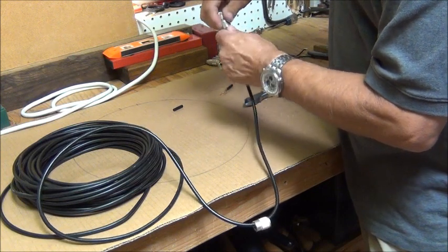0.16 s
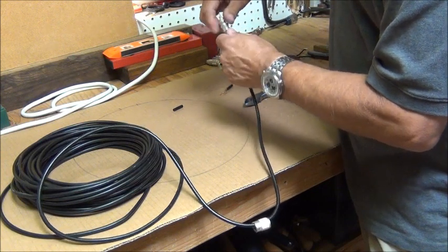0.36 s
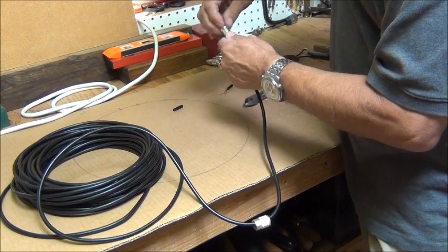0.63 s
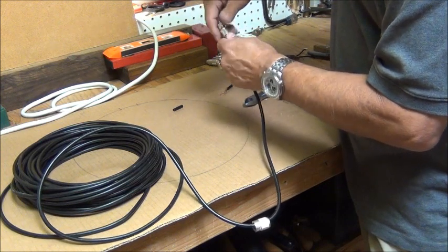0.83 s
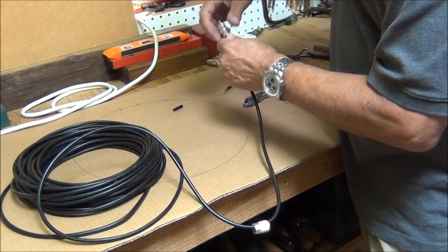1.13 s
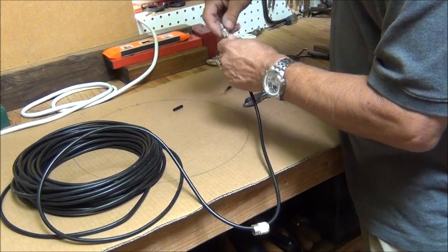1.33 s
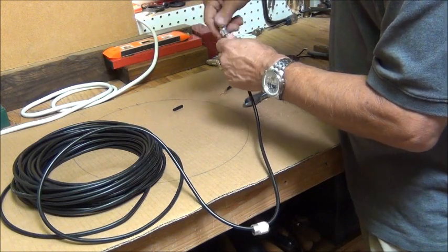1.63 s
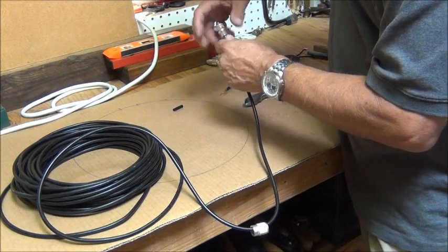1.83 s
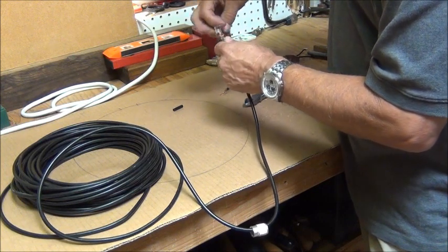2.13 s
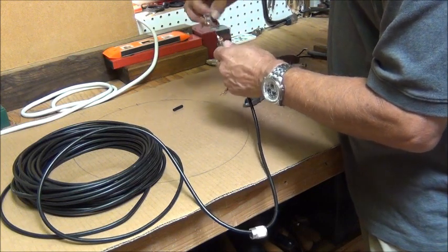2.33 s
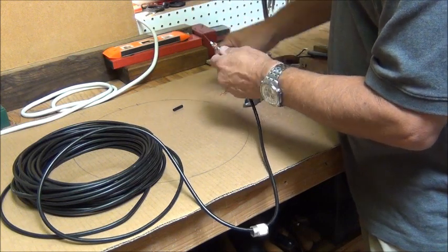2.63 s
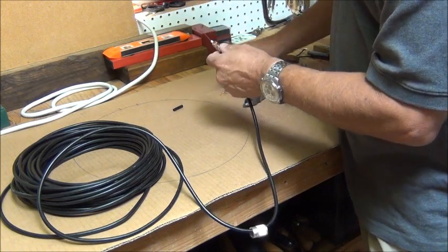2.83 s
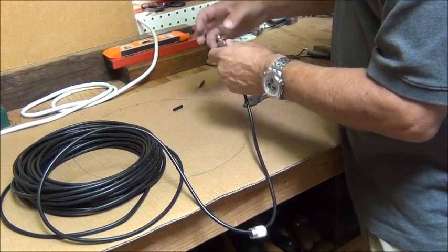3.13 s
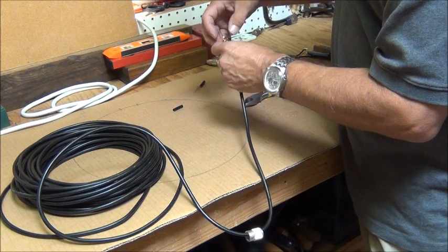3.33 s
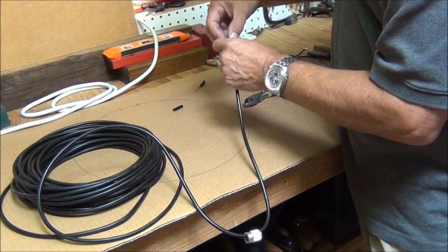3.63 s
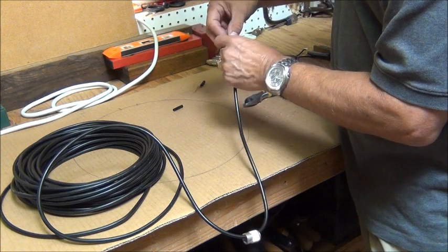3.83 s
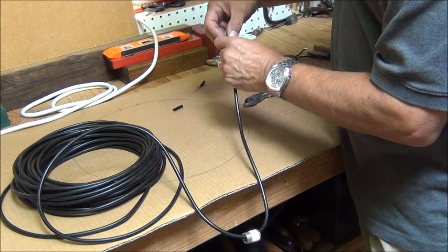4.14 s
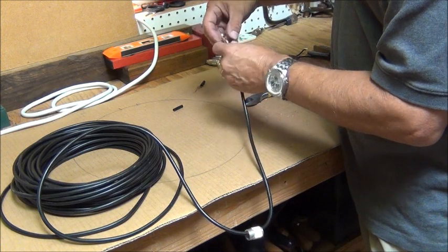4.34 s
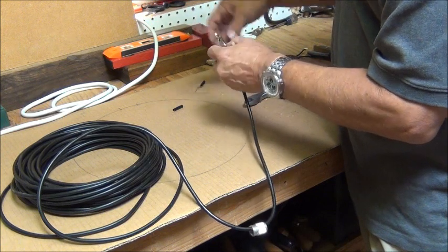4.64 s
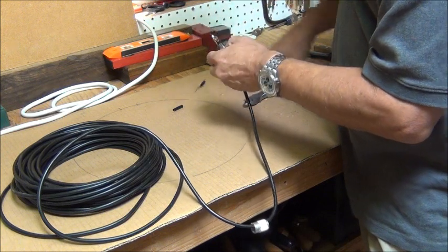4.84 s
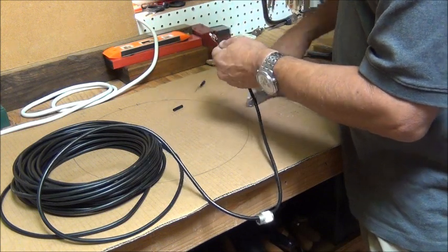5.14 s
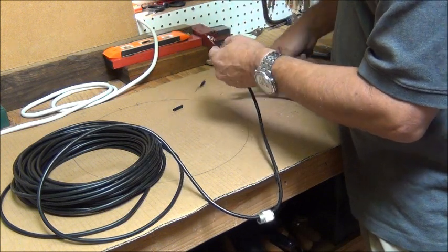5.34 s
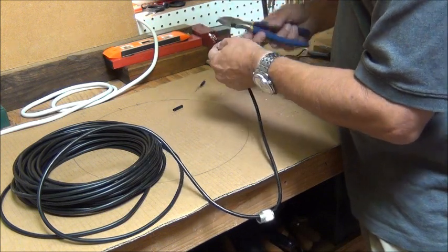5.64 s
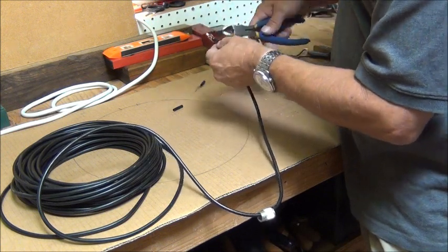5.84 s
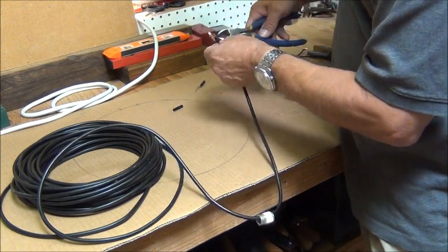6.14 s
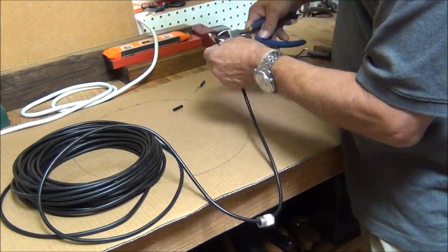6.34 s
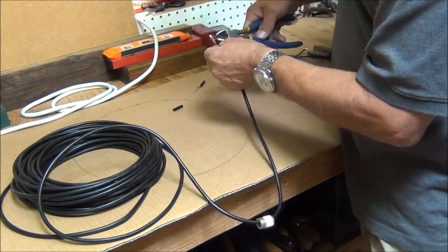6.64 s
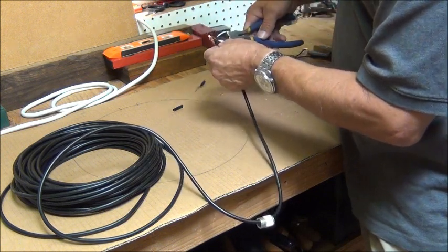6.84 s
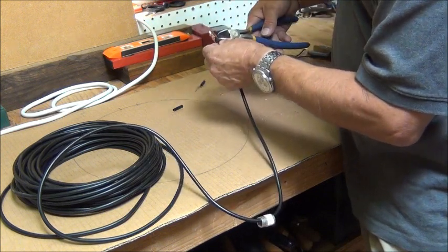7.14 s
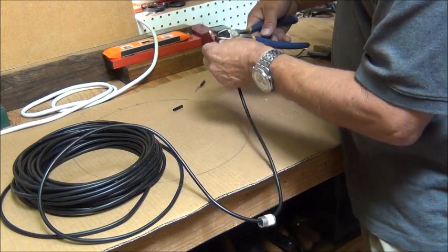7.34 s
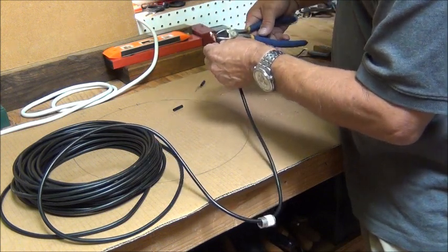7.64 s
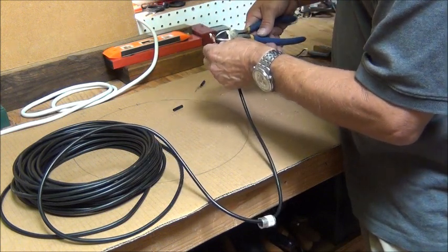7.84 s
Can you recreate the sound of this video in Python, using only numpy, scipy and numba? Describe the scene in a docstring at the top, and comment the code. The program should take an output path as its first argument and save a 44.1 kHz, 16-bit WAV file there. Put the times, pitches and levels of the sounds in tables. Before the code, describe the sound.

In a small workshop room, fingers fuss with cable braid, making faint high ticks and soft hissy rubs. Around three seconds a tool lands on the board with rattling knocks and scrapes; harder woody knocks follow past four and five seconds. A single bright steel clack of the cutters comes near 5.8, then almost only low rumble, hiss and fan tone remain. Close stereo microphone.

```python
"""Hands strip and trim a coaxial cable at a board-topped workbench: tools knock, land and slide on it.
Knocks ring a set of bench tones and add a short crack of noise; wire, braid and tool tick brightly.
The cutters clack shut as a burst of short metal tones, fingers rub hiss from the braid, a thin whistle glides.
A small room answers with a noise tail over rumble, hiss, a breathy fan tone and a steady whine.
The recorder turns down after the loudest peaks and recovers slowly."""
import sys
import numpy as np
from scipy import signal
from scipy.fft import rfft, irfft
from scipy.io import wavfile
from scipy.ndimage import uniform_filter1d
from numba import njit

SR = 44100
rng = np.random.default_rng(int(sys.argv[2]) if len(sys.argv) > 2 else 0)


def file_out(sig):
    """Save sig as 16-bit WAV at sys.argv[1]."""
    # one column per channel
    cols = np.atleast_2d(sig).T
    # limit, then scale
    lim = np.clip(cols, -1, 1)
    pcm = np.round(lim * 32767).astype(np.int16)
    wavfile.write(sys.argv[1], SR, pcm)


N = 351873  # length in samples


def undb(db):
    """Turn decibels into a gain factor."""
    return 10 ** (np.asarray(db) / 20)


def fade(t60, length=.4):
    """Exponential decay, 60 dB down after t60 seconds (2 ms at least)."""
    return np.exp(-np.log(1000) * np.arange(int(length * SR)) / SR / max(t60, .002))


def lowpass(x, hz):
    """Gently remove what lies above hz."""
    return signal.sosfilt(signal.butter(2, hz, fs=SR, output="sos"), x)


def band(x, hz, octaves):
    """Keep a band around hz, its edges held inside the range of hearing."""
    edges = [hz * 2 ** (-octaves / 2), hz * 2 ** (octaves / 2)]
    edges = np.clip(edges, [20, 40], [15000, 20000])
    return signal.sosfilt(signal.butter(2, edges, "bandpass", fs=SR, output="sos"), x)


def add(out, s, x, peak_db, pan_db=0.):
    """Lay a sound into both channels at s seconds; pan_db is the level difference left to right."""
    i = int(s * SR)
    x = x[:N - i] / np.abs(x).max()
    out[:, i:i + len(x)] += x * undb(peak_db + np.array([[pan_db], [-pan_db]]) / 2)


def ring(modes):
    """A struck body: dying sine tones, each with its own chance strength and sign."""
    t = np.arange(int(.4 * SR)) / SR
    scatter_db = 1.8
    tones = []
    for hz, db, t60 in modes:
        strength = undb(db + scatter_db * rng.standard_normal()) * rng.choice([-1, 1])
        tones.append(strength * np.sin(2 * np.pi * hz * t) * fade(t60))
    return sum(tones)


def chatter(body, t60, spike):
    """Contact that does not settle at once: a first blow and a dying run of small ones drive the body."""
    blows = rng.standard_normal(int(.4 * SR)) * fade(t60)
    blows[0] += spike
    return signal.fftconvolve(body, blows)


def crack(hz, octaves, t60, spike):
    """A sharp contact pulse followed by a dying rattle, in one band."""
    x = rng.standard_normal(int(.4 * SR)) * fade(t60)
    x[0] += spike
    return band(x, hz, octaves)


def walk(rate):
    """Random levels, 1 / rate seconds apart, joined by straight ramps."""
    k = int(SR / rate)
    return uniform_filter1d(np.repeat(rng.standard_normal(N // k + 1), k), k)[:N]


def knocks():
    """Each blow wakes the bench tones near its own centre and cracks on the surface."""
    # blows: t/s, thud peak level/dB, thud centre f/Hz, settling t60/s, crack peak level/dB, crack f/Hz
    bench_blows = [(2.967, -13.5, 524, 0.14, -22, 2880), (2.99, -19.5, 480, 0.35, -21.5, 2720),
                   (3.073, -10, 413, 0.12, -16, 2640), (3.108, -12, 403, 0.13, -21, 2900),
                   (3.139, -32, 164, 0.16, -25.5, 2160), (3.175, -47, 178, 0.19, -22.5, 2700),
                   (4.181, -10, 654, .22, -5.5, 1970), (4.239, -18, 613, 0.15, -23, 1370),
                   (4.251, -23.5, 384, 0.6, -40, 1120), (4.347, -18.5, 790, 0.18, -31.5, 1310),
                   (4.36, -18.5, 570, 0.15, -29.5, 1240), (4.377, -11.5, 716, .15, -14.5, 1630),
                   (4.384, -33, 581, 0.092, -8.5, 1110), (4.431, -11, 794, 0.11, -12.5, 1400),
                   (4.693, -33, 370.8, 0.13, -45, 1033), (4.941, -26.5, 232, 0.21, -45, 1190),
                   (4.979, -27, 162, .12, -45, 1040), (5.035, -25.5, 203, .18, -38.5, 1010),
                   (5.111, -24, 270, 0.38, -23, 1840), (5.217, -9.5, 260, 0.17, -22, 1150),
                   (5.234, -14, 175, 0.13, -25, 1110), (5.278, -15, 220, 0.066, -30, 2290),
                   (5.304, -15.5, 172, 0.078, -28.5, 2230)]
    # tones of the bench: f/Hz, relative level/dB, t60/s
    bench_tones = [(130, -1, 0.082), (166, -2, 0.14), (210, -7, 0.093), (260, -4, 0.1), (325, -1, 0.03),
                   (319, 1, 0.029), (381, -2, 0.05), (445.5, -2, 0.046), (488, 0.5, 0.031), (583, 2, 0.035),
                   (688, 3, 0.012), (816, 0, 0.018), (1207, 9, 0.012), (1380, -12, 0.0078)]
    # a hand stills the board: t/s, fall time/s, level after/dB
    hand_grip = (5.338, .008, -18)
    # the hardest first contact: t/s, peak level/dB, centre f/Hz
    hard_contact = (4.1806, -.5, 2100)
    crack_octaves = 1.44
    bright_t60_s = 0.05  # the top of each crack is gone first
    out = np.zeros((2, N))
    for s, thud_db, thud_hz, settle_t60, crack_db, crack_hz in bench_blows:
        modes = [(hz, db - 5.1 * np.log2(hz / thud_hz) ** 2, t60) for hz, db, t60 in bench_tones]
        thud = chatter(ring(modes), settle_t60, spike=13.3)
        thud = band(thud, 463, 2.87)  # a small board radiates no deep bass
        add(out, s, thud, thud_db)
        crack_t60 = 0.069 + 0.31 * settle_t60  # a base time plus a share of the settling
        snap = crack(crack_hz, crack_octaves, crack_t60, spike=4.8)
        snap = band(snap, crack_hz, 2.34 * crack_octaves)
        dull = lowpass(snap, 2600)
        snap = dull + (snap - dull) * fade(bright_t60_s)
        snap = lowpass(snap, 5200)  # the soft board swallows the top
        add(out, s, snap, crack_db)
    s, fall, db = hand_grip
    out *= undb(np.interp(np.arange(N) / SR, [s, s + fall], [0, db]))
    s, db, hz = hard_contact
    pulse = band(band(signal.unit_impulse(400), hz, 1.3), hz, 2.2)
    add(out, s, -pulse, db)
    return out


def landings():
    """A tool lands on the bench and its frame rings in a few metal tones."""
    # landings: t/s, peak level/dB
    tool_drops = [(2.968, -24.5), (3.074, -21), (3.11, -31)]
    # tones of the tool frame: f/Hz, relative level/dB, t60/s
    frame_tones = [(2190, -9, 0.043), (2890, -1, 0.14), (3390, -14, 0.088)]
    out = np.zeros((2, N))
    for s, db in tool_drops:
        add(out, s, chatter(ring(frame_tones), 0.075, spike=11.5), db)
    return out


def shakes():
    """The bench frame shudders: narrow low noise that dies away."""
    # shudders: t/s, peak level/dB, f/Hz, t60/s
    frame_shudders = [(4.191, -44, 168, 0.54), (4.368, -33.5, 169, 0.94), (4.95, -45, 47.5, .25),
                      (5.222, -44, 48, .25)]
    out = np.zeros((2, N))
    for s, db, hz, t60 in frame_shudders:
        add(out, s, crack(hz, 0.33, t60, spike=0), db)
    return out


def clacks():
    """The cutter jaws clack shut and ring as steel; handles, grips and spring sound from the first contact."""
    # jaw contacts: t/s, peak level/dB
    jaw_contacts = [(5.7693, -3), (5.771, -12), (5.7726, -10)]
    # tones of the steel jaws: f/Hz, relative level/dB, t60/s
    jaw_tones = [(2680, 3.5, 0.011), (3200, -2, 0.0053), (4400, -0.5, 0.0032), (5400, -10, 0.0023),
                 (6620, 3.5, 0.0031), (7750, 1.5, 0.0066), (9240, -1, 0.0038), (9930, 7, 0.0026),
                 (12500, -4, 0.0018), (14500, -8, 0.0021)]
    handles_db, handles_t60_s, grips_db, spring_db = -21, .12, -28, -16
    out = np.zeros((2, N))
    for s, db in jaw_contacts:
        add(out, s, chatter(ring(jaw_tones), 0.0088, spike=1.3), db)
    shut_s = jaw_contacts[0][0]
    add(out, shut_s, chatter(ring(jaw_tones), handles_t60_s, spike=0), handles_db)  # loose handles rattle
    add(out, shut_s, crack(1040, 1.7, 0.038, spike=6.8), grips_db)  # the grips knock dully
    add(out, shut_s, crack(8500, 1.9, 0.093, spike=3.5), spring_db)  # pivot and spring buzz broadly
    return out


def ticks():
    """Short bright clicks of wire, braid and tool that also ring the stripping tool."""
    # clicks: t/s, peak level/dB, centre f/Hz, width/octaves
    bright_clicks = [(.2883, -33, 12200, 2.1), (.7347, -31, 11500, 1.3), (.7617, -20.5, 12800, 1.5),
                     (.922, -22, 3180, 2.4), (.932, -33, 3200, 1.2), (.9916, -27, 14300, 1.6),
                     (1.3753, -30, 13600, 2.4), (1.4167, -29, 11000, .85), (1.487, -23.5, 8000, 2.2),
                     (1.5006, -17, 11200, 1.2), (1.804, -26, 10600, 0.8), (1.837, -25, 8820, 0.45),
                     (2.07, -28, 8300, 1.4), (2.173, -32.5, 12000, 1.2), (2.294, -28, 11100, 1.8),
                     (2.3477, -24, 11600, 0.39), (2.3604, -24, 12600, 0.45), (2.389, -17, 10000, .9),
                     (2.4298, -21, 11200, 0.91), (2.9673, -15.5, 3340, 3.9), (3.073, -16, 3490, 1.8),
                     (3.108, -16, 3800, 1.5), (3.1763, -12, 3340, 1), (3.241, -17.5, 9970, 0.35),
                     (3.3099, -27, 9420, 1.2), (3.333, -15, 12100, 0.84), (3.434, -27.5, 13400, .91),
                     (3.4545, -31, 10200, 0.78), (3.5258, -27.5, 10200, 0.5), (3.58, -33, 11800, .97),
                     (3.9569, -32, 11400, 0.82), (4.181, -28, 6500, 1.3), (4.975, -32.5, 4940, 1.2),
                     (5.111, -20.5, 3250, 0.8), (5.2993, -17.5, 3110, 1.5), (6.96, -31, 5810, 1.6)]
    # tones of the stripping tool: f/Hz, relative level/dB, t60/s
    blade_tones = [(3300, 3, 0.004), (5170, -5, 0.007), (6430, -8, 0.0085), (9000, 2.5, 0.0049),
                   (10580, 1.5, 0.0042), (11520, 2, 0.0061), (13030, -2, 0.007)]
    tick_t60_s, pan_spread_db = 0.021, 2
    out = np.zeros((2, N))
    for s, db, hz, octaves in bright_clicks + crinkles():
        octaves = max(octaves, .1)
        pan_db = pan_spread_db * rng.standard_normal()
        click = band(crack(hz, octaves, tick_t60_s, spike=11.0), hz, 1.6 * octaves)
        add(out, s, click, db, pan_db)
        modes = []
        for f, level, decay in blade_tones:  # tones far from the click's pitch sound weaker
            distance = np.log2(f / hz) / min(octaves, 1)
            modes.append((f, level - 4.8 * distance ** 2, decay))
        add(out, s, chatter(ring(modes), 0.82 * tick_t60_s, spike=1.7), db - 4.5, pan_db)
    return out


def crinkles():
    """List faint ticks at chance moments while the braid is fingered."""
    # spells of fingering: start t/s, end t/s
    finger_spells = [(.08, .36), (.54, .72), (1.06, 1.14), (1.33, 1.37), (1.72, 1.78), (3.46, 3.58),
                     (7.05, 7.26)]
    ticks_per_s, faintest_db, middle_hz, octaves = 12, -39.5, 11000, 0.94
    rows = []
    for start, end in finger_spells:
        count = int(np.ceil((end - start) * ticks_per_s))
        for at, size, pitch in rng.random((count, 3)):
            s = start + at * (end - start)
            hz = middle_hz * 2 ** (.4 * (pitch - .5))
            rows.append((s, faintest_db + 4.6 * size, hz, octaves))
    return rows


def pings():
    """A small metal part rings high, with a broad click at each contact."""
    # pings: t/s, peak level/dB, share of the tones above 13 kHz (0-1)
    part_hits = [(4.5067, -26, 0.84), (4.5718, -25.5, 0.4)]
    # tones of the part: f/Hz, relative level/dB, t60/s
    part_tones = [(6300, -8, 0.034), (9130, 2, .04), (9350, -4, 0.086), (12100, -2, .06), (13930, -8, .05),
                  (13900, -2, 0.077)]
    out = np.zeros((2, N))
    for s, db, share in part_hits:
        share = np.clip(share, .02, .98)
        modes = []
        for hz, level, t60 in part_tones:
            weight = share if hz > 13000 else 1 - share
            modes.append((hz, level + 20 * np.log10(weight), t60))
        add(out, s, chatter(ring(modes), .02, spike=5.4), db)
        add(out, s, crack(6200, 5.4, 0.056, spike=1.8), db - 0.6)
    return out


def slides():
    """Tools slide over the board: dense scraping that starts abruptly, its very top dulled by the board."""
    # slides: start t/s, length/s, level at start/dB, change by the end/dB, centre f/Hz, width/octaves
    # (levels hold before the uneven grains and the board's own band)
    tool_slides = [(.63, 0.13, -67, 11, 4970, 1.1), (1.426, 0.067, -53, -8, 5000, 0.68),
                   (1.487, .05, -44, -15, 5350, .43), (1.792, 0.086, -51.5, -3, 5000, 2.1),
                   (2.36, 0.065, -56, -3, 5000, .8), (2.964, 0.06, -42, 1.5, 9000, 1.8),
                   (3.0, 0.033, -39, 8, 11100, .6), (3.014, 0.054, -31.5, -13, 3680, 1.4),
                   (3.035, .03, -32, -12, 11100, 0.59), (3.073, 0.027, -29.5, -11, 11200, .73),
                   (3.074, .035, -33, -6, 3500, 1.8), (3.11, 0.065, -38.5, -8, 8000, 2.3),
                   (3.157, 0.013, -35.5, 6, 11000, 1.3), (3.177, .06, -33, -17, 2600, .9),
                   (3.193, .06, -33.5, -9, 11700, 0.77), (5.11, .011, -29, -7, 7000, 1.7),
                   (5.128, .013, -23.5, -16, 8000, 5.1), (5.145, 0.045, -22, -11.5, 3880, 2.66),
                   (5.198, 0.069, -33, -2.5, 7000, 4.6), (5.271, 0.057, -44, -12, 2980, 1.9)]
    out = np.zeros(N)
    for s, length, db, change_db, hz, octaves in tool_slides:
        i, n = int(s * SR), max(int(length * SR), 50)
        scrape = band(rng.standard_normal(6000)[:n], hz, octaves)
        level = undb(db + np.linspace(0, change_db, len(scrape)))
        out[i:i + len(scrape)] += scrape / scrape.std() * level
    grains = undb(3.4 * walk(500) + 1.6 * walk(150))  # grains catch unevenly
    return band(out * grains, 3100, 4.6)


@njit
def sweep(x, hz, q):
    """Resonant band filter whose centre can move; a larger q is wider."""
    y, b, l = np.empty(len(x)), 0., 0.
    for i in range(len(x)):
        g = np.tan(np.pi * hz[i] / SR)
        v = (b + g * (x[i] - l)) / (1 + g * (g + q))
        b, l, y[i] = 2 * v - b, l + 2 * g * v, q * v
    return y


def rubs():
    """Fingers rub the braid: uneven hiss through a wide resonance, swelling and sinking with each rub."""
    # rubs: start t/s, loudest t/s, end t/s, level at loudest/dB, centre f/Hz
    finger_rubs = [(0.622, 0.727, 0.85, -52.5, 8000), (1.4, 1.46, 1.58, -44.5, 8650),
                   (1.723, 1.76, 1.95, -51, 10300), (2.05, 2.16, 2.32, -50, 8400),
                   (2.33, 2.38, 2.5, -41.5, 10700), (4.94, 4.975, 5.18, -52, 5600),
                   (5.523, 5.6, 5.6, -47, 10600), (5.853, 5.9, 5.9, -50, 10000)]
    edge_db = -61.5  # level at which each rub starts and, unless cut at its loudest, ends
    t, gain, hz = np.arange(N) / SR, np.zeros(N), np.full(N, 9000.)
    for start, loudest, end, db, centre in finger_rubs:
        inside = (t > start) & (t < end)
        gain[inside] = undb(np.interp(t[inside], [start, loudest, end], [edge_db, db, edge_db]))
        hz[inside] = centre
    grit = rng.standard_normal(N) * undb(4.1 * walk(300) + 2.6 * walk(60))
    hz = np.clip(hz, 2000, 15000)
    grit = sweep(sweep(grit, hz, 1.9), hz, 1.9)
    return gain * grit / grit.std()


def whistle():
    """A faint sine glides high up, its level flickering."""
    # two glides, each a list of points: t/s, f/Hz
    glides = [
        [(1.2, 11700), (1.27, 11400), (1.32, 11900), (1.37, 12700), (1.46, 12950), (1.59, 13000), (1.65, 12000),
         (1.71, 11950), (1.76, 12750), (1.9, 13000), (1.96, 12000)],
        [(4.73, 11700), (4.78, 12050), (4.83, 13100), (4.88, 13200), (4.95, 13000)],
    ]
    middle_db, db_per_khz, middle_hz, fade_s = -64, -2.5, 11950, .03  # fainter away from the middle pitch
    out, flicker = np.zeros(N), undb(4.5 * walk(40))
    for glide in glides:
        s, hz = np.transpose(glide)
        i = np.arange(int(s[0] * SR), int(s[-1] * SR))
        pitch = np.interp(i / SR, s, hz)
        ends = np.minimum(1, np.minimum(i / SR - s[0], s[-1] - i / SR) / fade_s)
        db = middle_db + db_per_khz * np.abs(pitch - middle_hz) / 1000
        tone = np.sqrt(2) * np.sin(2 * np.pi * np.cumsum(pitch) / SR)
        out[i] = undb(db) * ends * tone
    return out * flicker


def room(x):
    """Echoes as a dense noise tail; its treble differs more between the channels and dies first."""
    t60_s, treble_t60_s, tail_db = 0.37, 0.14, -6
    noise = rng.standard_normal((3, int(.4 * SR)))  # one shared, one for each channel
    low = lowpass(noise, 1200)
    high = noise - low
    low_tail = (low[0] + 0.099 * low[1:]) * fade(t60_s)
    high_tail = (high[0] + 1.24 * high[1:]) * fade(treble_t60_s)
    tail = (low_tail + high_tail) * (1 - fade(0.015))  # the tail builds up briefly
    tail *= undb(tail_db) / np.sqrt((tail ** 2).sum(axis=1, keepdims=True))
    return signal.fftconvolve(x, tail, axes=1)[:, :N]


def coloured(table, db):
    """Steady noise with the given spectrum, scaled to an overall level."""
    hz, level = np.transpose(table)
    f = np.maximum(np.arange(N // 2 + 1) * SR / N, 1)
    shape = undb(np.interp(np.log(f), np.log(hz), level))
    x = irfft(rfft(rng.standard_normal(N)) * shape, N)
    return x * undb(db) / x.std()


def fan():
    """A breathy fan tone: narrow bands of noise, partly shared by the two channels."""
    # bands: f/Hz, width/Hz, level before sharing/dB
    fan_bands = [(873, 53, -58.5), (904, 27, -61)]
    out = np.zeros((2, N))
    for hz, width, db in fan_bands:
        tone = band(rng.standard_normal((2, N)), hz, width / hz * np.log2(np.e))
        left, right = tone[0] + 0.21 * tone[1], tone[0] - 0.17 * tone[1]
        out += undb(db) * np.array([left, right]) / tone.std()
    return out


def whine():
    """A steady electrical whine: one very high sine."""
    whine_hz, whine_db = 15735, -64
    return np.sqrt(2) * undb(whine_db) * np.sin(2 * np.pi * whine_hz * np.arange(N) / SR)


def air():
    """Room rumble and microphone hiss: noise alike in both channels plus noise opposite in them."""
    # spectrum of the alike part: f/Hz, relative level/dB
    mid_spectrum = [(15, -42), (25, -9.5), (55, 0.5), (92, -1.5), (157, 0), (242, -4.5), (293, -4),
                    (335, -5.5), (516, -7.5), (887, -8), (962, -9), (1520, -14), (16000, -20.5)]
    # spectrum of the opposite part: f/Hz, relative level/dB
    side_spectrum = [(15, -55), (25, -28), (130, -6.5), (161, -9), (249, -1.5), (1100, -3), (1260, -4.5),
                     (2000, -8.5), (14400, -21), (16000, -31)]
    mid, side = coloured(mid_spectrum, db=-47), coloured(side_spectrum, db=-53)
    return np.array([mid + side, mid - side])


def scene():
    """Bench sounds with their room over the steady background."""
    near = knocks() + landings() + shakes() + clacks() + ticks() + pings()
    near = near + slides() + rubs() + whistle()  # these three are alike in both channels
    return near + room(near) + fan() + whine() + air()


@njit
def follow(x, hold, release):
    """Peak follower: jumps up, holds for some samples, then sinks slowly."""
    e, y, wait = 0., np.empty(len(x)), 0.
    for i in range(len(x)):
        if x[i] > e:
            e, wait = x[i], hold
        elif wait > 0:
            wait -= 1
        else:
            e *= release
        y[i] = e
    return y


def record(dry):
    """Gain control turns down after peaks above a limit and recovers slowly; the top is cut."""
    limit, hold_s, recovery_db_per_s, top_hz = .52, .4, 6, 16000
    sensed = lowpass(dry, 4000)  # the control listens less to the treble
    peak = follow(np.abs(sensed).max(axis=0), hold_s * SR, undb(-recovery_db_per_s / SR))
    gain = np.minimum(1, limit / (peak + 1e-9))
    gain = signal.lfilter([.005], [1, -.995], gain - 1) + 1  # the gain moves over a few milliseconds
    return signal.sosfilt(signal.ellip(10, .2, 70, top_hz, fs=SR, output="sos"), dry * gain)


dry = scene()
out = record(dry)
file_out(out)
```